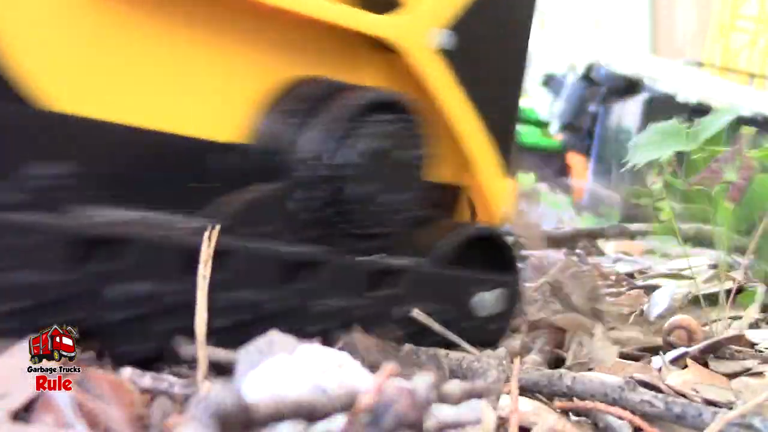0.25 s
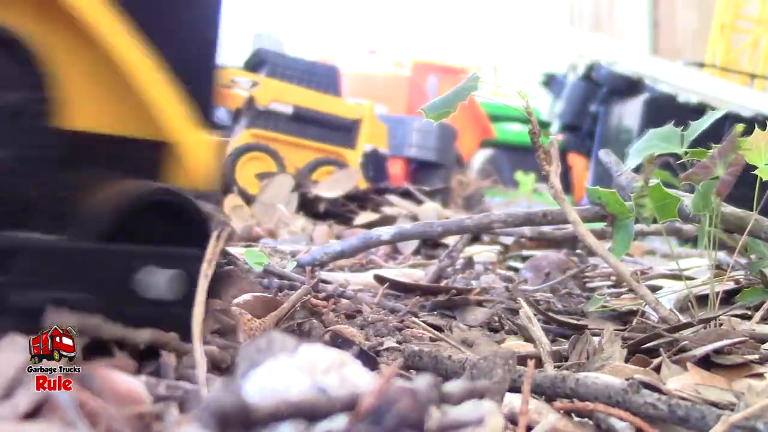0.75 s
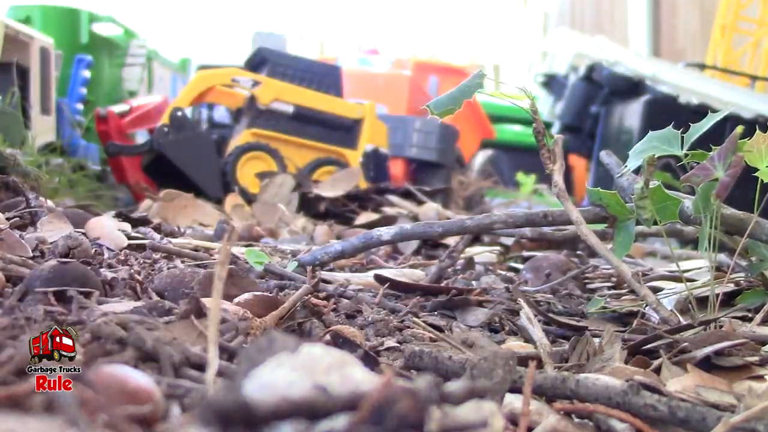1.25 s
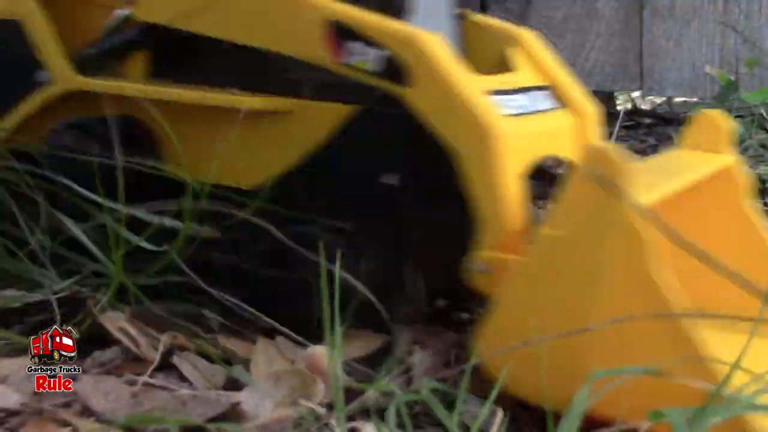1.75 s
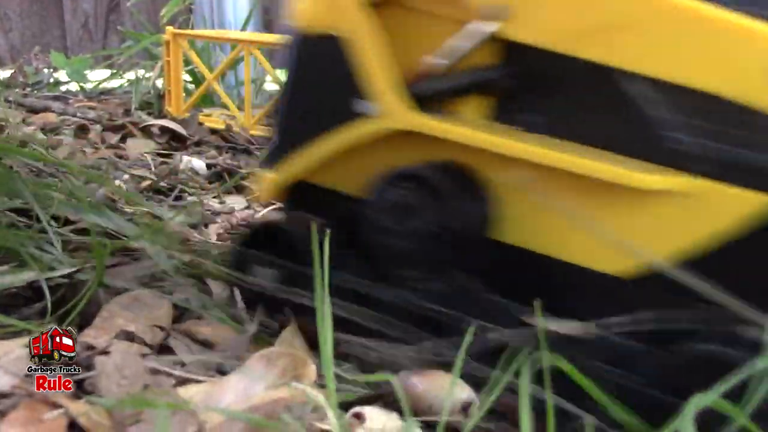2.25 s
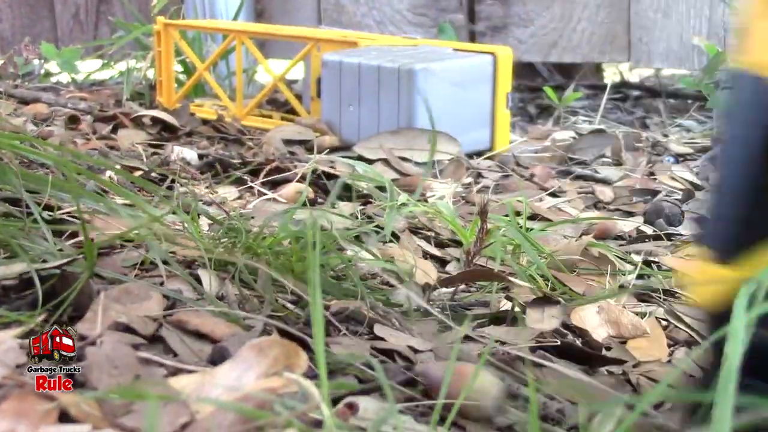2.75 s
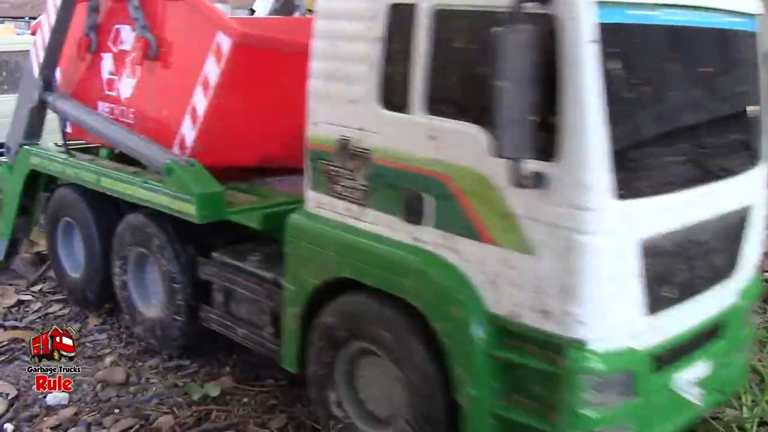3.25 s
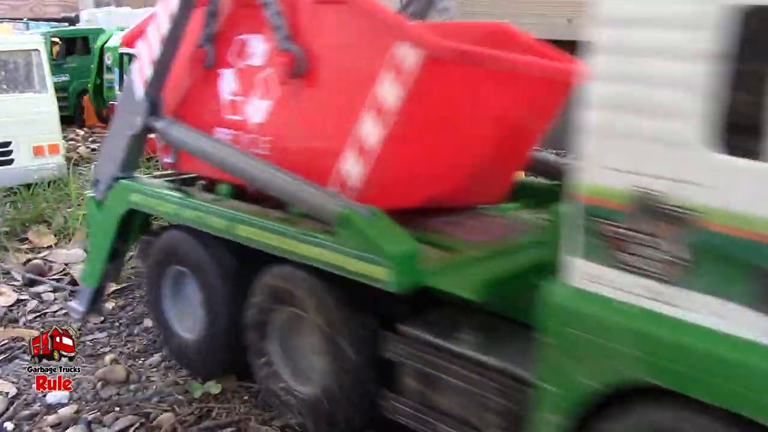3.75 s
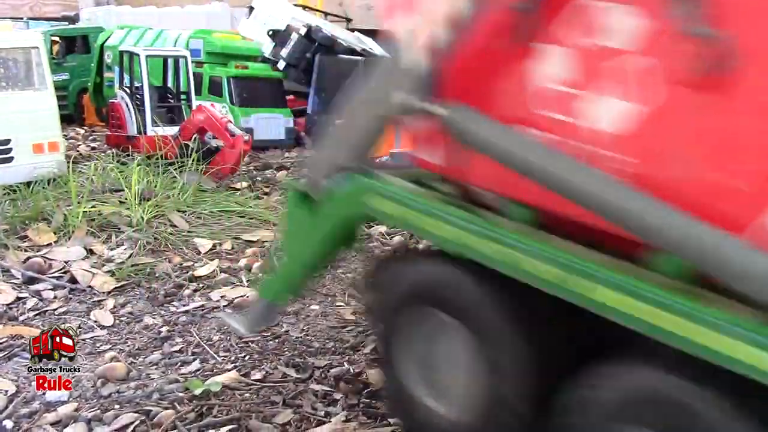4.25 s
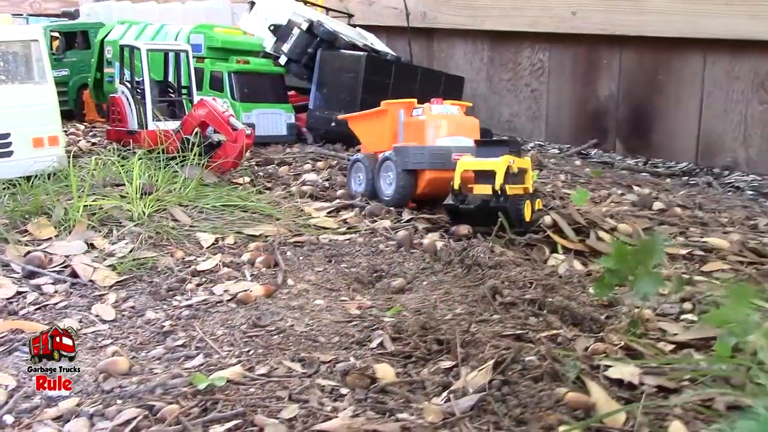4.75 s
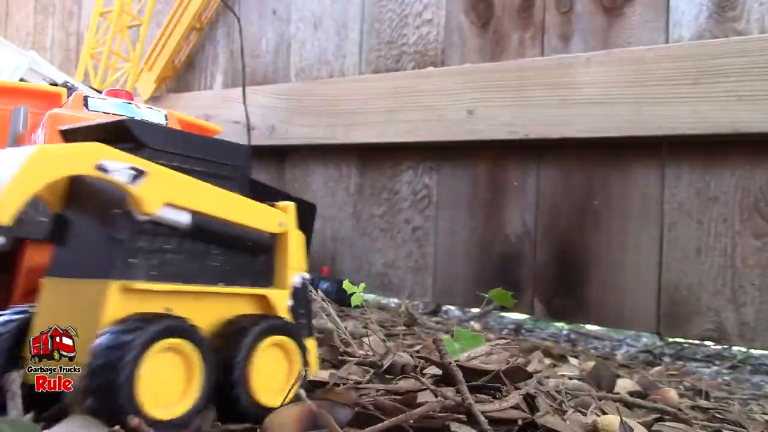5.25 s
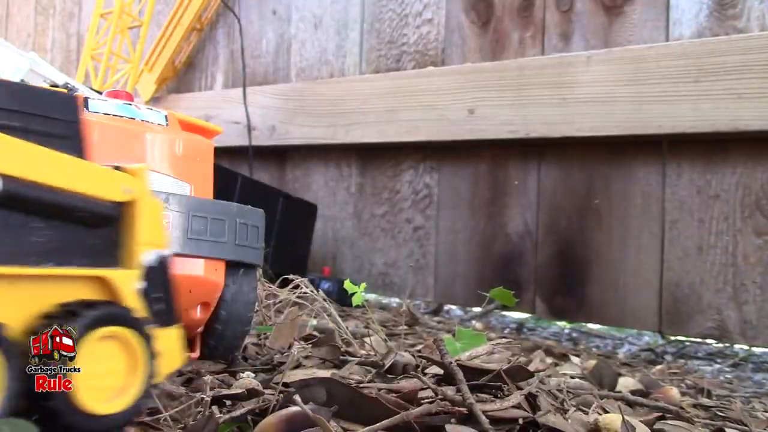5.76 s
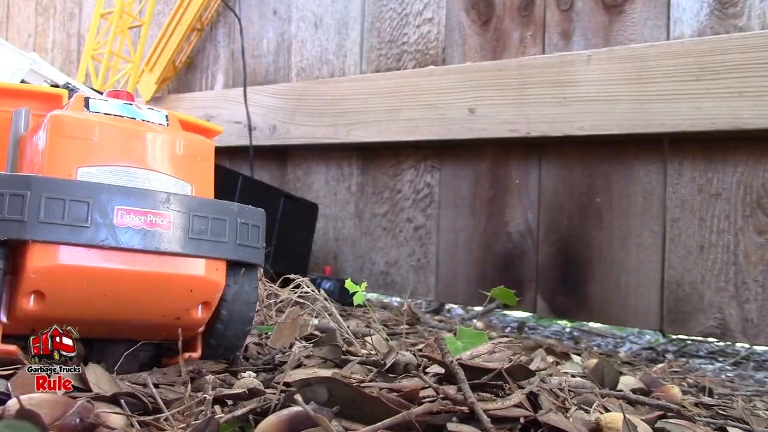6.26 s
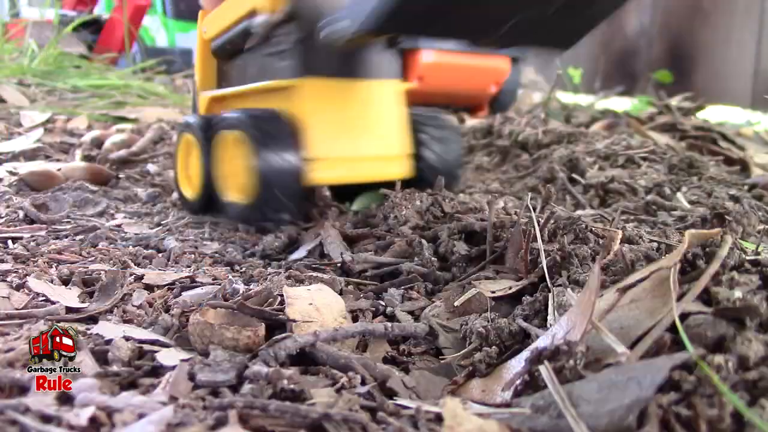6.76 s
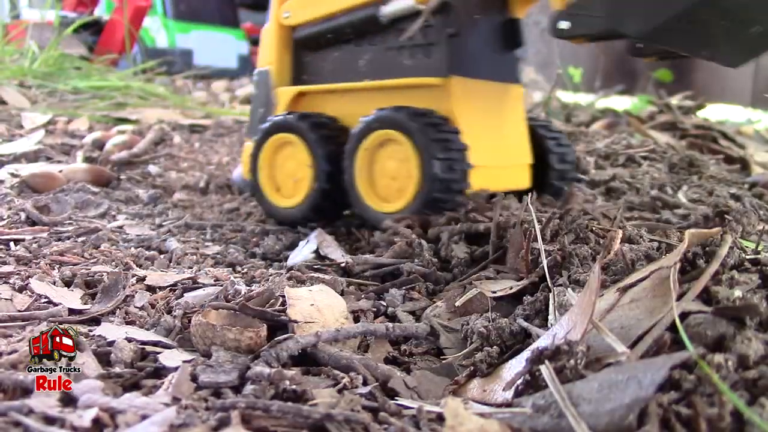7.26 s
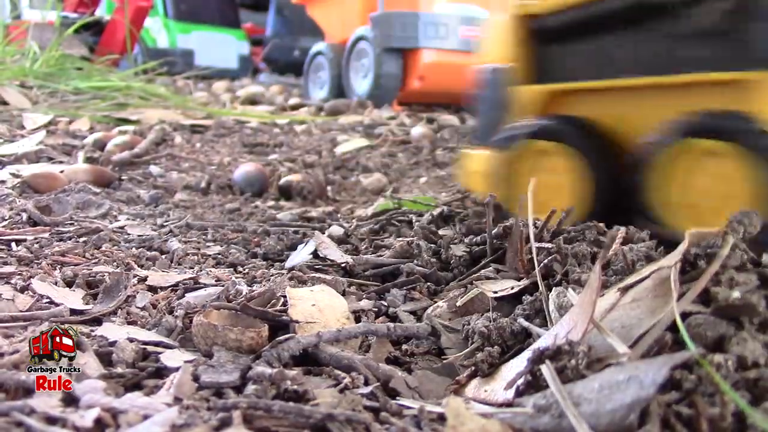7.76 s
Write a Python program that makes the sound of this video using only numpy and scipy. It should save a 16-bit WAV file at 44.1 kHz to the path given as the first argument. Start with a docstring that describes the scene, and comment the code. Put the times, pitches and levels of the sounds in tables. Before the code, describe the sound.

Close crackle of dry leaves and grit under toy truck wheels, with hollow plastic rattles, thumps and small axle squeaks.

```python
"""Plastic toy trucks pushed over dry leaves and dirt close to the microphone, in five corners of a yard.
At first far traffic rumbles behind; grit jolts the wheels and rings the hollow shells, leaves crackle,
parts knock, and a wooden fence throws a short echo back. From 3.2 s, in a quieter corner, a truck with
a deeper shell thumps along. From 5.1 s the last one rolls more softly on dry, squeaking axles, and from
6.75 s a faint hiss of insects swells behind it."""
import sys
import numpy as np
from scipy import signal
from scipy.fft import next_fast_len
from scipy.io import wavfile
from scipy.ndimage import uniform_filter1d

SR = 44100
rng = np.random.default_rng(int(sys.argv[2]) if len(sys.argv) > 2 else 0)


def materialize(psi):
    """Save the field psi as 16-bit PCM at rate SR to the path in sys.argv[1].

    A 1-D psi becomes a single channel; in a 2-D psi each row is a channel.
    """
    bounded = np.clip(np.atleast_2d(psi).T, -1, 1)
    quanta = np.round(bounded * 32767).astype(np.int16)
    wavfile.write(sys.argv[1], SR, quanta)


N = 353682

# far traffic and air in each corner: (start [s], relative level [dB], [(frequency [Hz], density [dB])])
CORNERS = [ (0, -24, [(40, -21), (70, -3), (140, 0.5), (340, 7.5), (450, 5), (800, -9), (1700, -11.5),
           (3200, -30.5), (6500, -25), (9000, -18.5), (16000, -49)]), (1.75, -33, [(40, -20), (70, -14),
           (150, 0.5), (300, -6), (600, -26), (1500, -15.5), (4000, -11), (16000, -15.5)]),
           (3.101, -46.5, [(40, -5), (70, -12), (150, -4), (300, -13), (500, -21), (800, -18), (1500, -39),
           (4000, -16), (16000, -22)]), (5.14, -36, [(40, -27), (70, 4), (150, 6), (250, 2.5), (400, 0),
           (800, 2), (2000, -8), (3500, -18), (7000, -6.5), (16000, -29)]), (6.62, -38.5, [(40, -12),
           (60, -1), (90, 0), (190, 4), (350, -4.5), (750, -1.5), (1500, -13), (2300, -5), (3500, -31),
           (6500, -60), (10000, -16.5), (16000, -31)]), ]
# low hums in the distance: (start [s], end [s], pitch [Hz], waver [Hz], level [dB])
DRONES = [(0.974, 1.755, 143.8, 3.3, -39.5), (1.1, 1.7, 96, 7.8, -48), (3.1, 4.25, 73, 5.1, -58.5),
          (6.652, 8.1, 115, 2.4, -47.5)]
# single dry leaves by the microphone: (time [s], level [dB], pitch [Hz])
LEAF_TICKS = [(0.0298, 11.5, 5100), (0.0732, -9, 4590), (0.1077, -4, 4560), (0.1979, -3, 5050),
              (0.2573, 8, 5560), (0.2927, -3, 9610), (0.4209, 8, 4300), (0.4928, 3, 5670),
              (0.538, -4, 5380), (0.7063, 1, 5710), (0.7512, 0, 6800), (0.8325, 3.5, 5630),
              (0.8964, -3, 5570), (1.0181, -12, 4980), (1.048, -11, 5700), (1.0984, -10, 5260),
              (1.1832, -6, 5530), (1.2231, -6, 9100), (1.3294, -34, 5240), (1.3728, -11, 4510),
              (1.4361, -16, 5260), (1.723, -11, 9100), (1.8277, -8, 4830), (2.0058, 4, 4400),
              (2.174, -9, 4540), (2.2573, -9, 4830), (2.4284, -14, 9000), (2.5661, -6, 7180),
              (2.59, -14.5, 7000), (2.6599, -11.5, 8000), (2.6838, -18, 8970), (2.7457, -17, 8290),
              (2.9512, -5.5, 7400), (3.1093, -27, 5980), (3.2695, -27, 4400), (3.286, -19, 8270),
              (3.3503, -8.5, 7950), (3.3847, -7, 4360), (3.6172, -12, 4500), (3.6391, -4, 4430),
              (3.7479, -12, 5900), (3.7604, -12, 5950), (3.8457, -14.5, 5430), (3.9145, -4.5, 7350),
              (3.9973, -17, 6100), (4.0741, -7.5, 6100), (4.1121, -14, 6240), (4.3874, -4, 4510),
              (4.5221, -10, 4410), (4.6184, -18, 4400), (4.786, -19, 7100), (5.0244, -17, 4650),
              (5.1567, -6, 9410), (5.3403, -15, 7000), (5.6451, -15, 5630), (5.9618, -22, 5280),
              (6.136, -19, 4540), (6.7241, -16, 5290), (6.7625, -7, 7500), (6.7895, -9, 5060),
              (6.8838, -22.5, 10000), (6.9511, -25, 10400), (7.076, -17, 5000), (7.1756, -38, 5170),
              (7.2469, -21, 5200), (7.65, 1, 4600), (7.7717, -15, 4610), (7.8047, -16, 5100)]
# dry axles: (start [s], length [s], first pitch [Hz], last pitch [Hz], level at the crest [dB])
AXLE_SQUEAKS = [(0.105, 0.029, 4660, 4370, -9), (.75, 0.0076, 6960, 6930, -16),
                (0.756, 0.017, 9700, 9500, -23), (0.786, 0.016, 6700, 6740, -19),
                (5.008, 0.058, 2120, 2136, -21), (5.089, 0.058, 2130, 2100, -30),
                (5.144, 0.034, 1950, 2010, -27), (5.22, 0.038, 1310, 1200, -40),
                (5.414, 0.058, 1287, 1146, -28), (5.43, 0.032, 2480, 2380, -23),
                (5.478, 0.038, 1986, 1967, -22), (5.587, 0.043, 1414, 1426, -33),
                (5.595, 0.015, 2080, 2020, -28.5), (5.834, 0.013, 1437, 1460, -22),
                (5.878, 0.031, 1420, 1586, -24.5), (5.902, 0.042, 1530, 1374, -17),
                (5.915, 0.024, 2800, 2820, -21.5), (6.02, .02, 2790, 2850, -23.5),
                (6.056, .07, 2830, 2790, -26), (6.016, 0.015, 1410, 1460, -22),
                (6.039, 0.018, 2020, 1980, -25), (6.043, 0.028, 1424, 1354, -20.5),
                (6.076, .026, 3610, 3640, -24.5), (6.084, 0.032, 1260, 1460, -31),
                (6.158, 0.018, 1333, 1432, -17), (6.204, 0.013, 1490, 1410, -20),
                (6.217, 0.041, 1380, 1180, -27.5), (6.21, 0.061, 2660, 2620, -32),
                (6.262, 0.016, 4020, 4200, -35), (6.292, 0.018, 2640, 2660, -31),
                (6.231, 0.016, 3950, 3780, -24), (6.249, 0.036, 1290, 1444, -20.5),
                (6.253, 0.025, 2190, 1970, -21), (6.287, 0.026, 1290, 1320, -21),
                (6.299, 0.018, 1900, 1960, -22), (6.387, 0.017, 1470, 1480, -30),
                (6.414, .04, 1504, 1410, -25.5), (6.538, 0.06, 2070, 1980, -39),
                (6.612, 0.058, 1480, 1450, -39), (6.722, 0.015, 5500, 5070, -21),
                (6.775, 0.028, 2000, 2030, -24), (6.96, 0.041, 1480, 1515, -35.5),
                (6.993, 0.036, 2370, 2165, -30.5), (7.364, 0.041, 2040, 1970, -35),
                (7.579, 0.064, 1950, 2000, -26), (7.629, 0.0355, 2023, 1466, -14.5),
                (7.634, 0.024, 3650, 3780, -20), (7.646, 0.019, 2900, 2850, -16),
                (7.668, 0.033, 1140, 1210, -22), (7.7, 0.016, 1500, 1570, -6),
                (7.712, 0.031, 1390, 1516, -13), (7.778, 0.031, 2174, 2150, -12.5),
                (7.801, 0.026, 1895, 1850, -7), (7.863, 0.024, 2040, 2040, -21),
                (7.882, .024, 1605, 1470, -22)]
# knocks of wheels and parts, and the sharp starts of axle squeaks:
# (time [s], blow [dB], shell thump [dB], pitch [Hz], crack against blow [dB])
KNOCKS = [(0.031, -4, -23, 744, -3), (0.072, 0, -28, 1280, -3), (0.107, 1, -37, 964, 0),
          (0.173, -2, -13, 1450, -10), (0.198, -11, -34, 937, 4), (0.327, -6, -7.5, 940, -1),
          (0.376, 2, -21, 2070, -1), (0.42, -3, -28, 680, -1), (0.447, 3, -18, 695, -7),
          (0.516, -1, -28, 1050, 10), (0.702, 0, -11.5, 750, -13), (0.877, -11, -18, 950, -5),
          (0.899, -15, -27, 904, -3), (1.017, -5, -34, 2080, -5), (1.031, 1, -33, 776, 0),
          (1.08, -3, -20, 880, 2), (1.093, -4, -19, 670, -3), (1.182, -6, -30, 725, -3),
          (1.228, 1.5, -14, 734, -5), (1.33, -10, -45, 1060, -3), (1.828, -13, -36, 780, -1),
          (1.841, -8.5, -34, 1750, -3), (2.004, -5.5, -40, 1000, 13.5), (2.174, -1.5, -26, 2830, 1),
          (2.255, 3, -17, 1660, -1), (2.319, -12, -16.5, 960, 3), (2.427, -3.5, -19, 1660, -13),
          (2.457, -5, -12, 800, -7), (2.471, -1, -27, 1020, 9.5), (2.512, -7, -27, 1040, -5),
          (2.727, -5, -33, 1030, -5), (2.792, -10, -38, 1030, -3), (2.881, -9.5, -28, 886, -14),
          (2.899, -6, -18, 1250, -9), (2.924, 1.5, -27, 600, 1), (2.951, 1.5, -26, 1030, -8),
          (2.977, -0.5, -28, 670, -2), (3.012, -8, -18, 816, -13), (3.11, -5, -30, 640, -8),
          (3.352, -7.5, -33, 3100, -15), (3.386, -4.5, -9, 640, 7), (3.477, -9.5, -11, 1200, -7),
          (3.615, -3, -38, 1360, 0), (3.887, -29, -13, 886, -3), (3.992, -9, -10.5, 694, -3),
          (4.144, -7.5, -6.5, 710, 7), (4.27, 2, 3, 560, 3.5), (4.339, -1.5, -6, 775, 0),
          (4.389, -15, -8, 900, -3), (4.449, -24, -10, 608, -3), (4.522, 4, -1, 1350, -8),
          (4.571, -10, 2.5, 605, -3), (4.617, 3, -9, 1100, -3), (4.731, -5, -25, 1060, -10),
          (4.786, -6, -27, 600, -8), (4.804, 0.5, -8, 643, 4), (4.933, -22, -5, 720, 4),
          (5.008, -1, -14, 796, -3), (5.025, 3.5, -19, 1500, -11), (5.361, -12, -45, 1500, -12),
          (5.476, -10, -46, 1920, 4), (5.838, -7, -45, 1480, -3), (5.888, -30, -47, 1510, -3),
          (5.907, -26, -43, 1520, -1), (5.971, -10.5, -26, 1820, 5), (6.026, -10, -44, 1500, 0),
          (6.14, -1, -33, 1530, 4), (6.21, -14, -51, 1370, -6), (6.297, -22, -44, 1320, -7),
          (6.349, -17, -45, 1320, -3), (6.361, -14, -44, 1390, -5), (6.377, -7.5, -39, 1950, -8),
          (6.425, 0.5, -40, 1640, 4), (6.462, -8, -39, 2040, -3), (6.527, -14.5, -42, 2040, -5),
          (6.625, -11, -38, 1520, -1), (6.731, 1.5, -49, 2260, -20), (6.884, -17.5, -37, 2060, 8),
          (7.411, -10.5, -41, 2040, 13), (7.579, -16, -20, 2020, -3), (7.628, -6, -46, 1990, -12),
          (7.651, -3.5, -49, 1590, 4), (7.704, -23, -40, 1550, -3), (7.77, 2, -41, 2120, 10),
          (7.803, 1, -43, 1880, -3), (7.872, -9, -32, 2010, 0), (7.909, -3.5, -39, 1890, 14),
          (7.996, -3, -48, 1550, 0)]
# surges of crunch as a truck lurches on: (start [s], hold [s], lift [dB])
SHOVES = [(0.023, 0.31, 2), (0.322, 0.014, 2), (0.431, .13, 14.5), (0.703, 0.25, 11), (1.025, 0.028, 6),
          (1.089, 0.084, 11.5), (1.186, 0.076, 11), (1.704, 0.036, 7), (1.83, .04, 2), (1.994, 0.048, 10.5),
          (2.17, 0.031, 3), (2.43, .07, 4), (2.706, 0.069, 4.5), (2.891, .1, 12), (3.077, 0.029, -1),
          (3.38, 0.051, 15.5), (3.461, 0.032, 10), (3.621, 0.025, 17.5), (3.745, 0.076, 4),
          (3.896, 0.016, 10.5), (3.989, 0.023, 11.5), (4.116, 0.1, 3.5), (4.27, 0.032, 2.5),
          (4.348, 0.056, 6.5), (4.522, 0.079, 7), (4.612, 0.053, 15.5), (4.798, 0.061, 7.5),
          (4.917, 0.03, 5.5), (5.005, .06, 5.5), (5.416, 0.14, 11.5), (5.555, 0.043, 13), (5.828, 0.012, 3),
          (5.907, 0.024, 17), (5.97, .04, 13.5), (6.02, 0.16, 10.5), (6.22, 0.096, 11), (6.348, 0.13, 18.5),
          (6.523, 0.067, 12), (6.634, 0.067, 15), (6.71, 0.088, 22), (6.955, 0.088, 1), (7.347, 0.053, 7.5),
          (7.45, 0.063, 12.5), (7.579, 0.12, 13), (7.682, 0.06, 4.5), (7.76, 0.09, 7), (7.865, 0.047, 7.5)]
# share of that lift each part takes: (wheels [ratio], shell [ratio], leaves [ratio])
SHOVE_SHARE = [0.8, 0.48, 0.55]
# rolling drive before shoves, one list a corner: (time [s], wheels [dB], shell [dB], leaves [dB])
PASSES = [
    [(0.02, -15, -21, -14), (0.386, -17.5, -24.5, -19.5), (0.51, -24, -29.5, -23), (0.764, -17, -25.5, -19),
     (0.948, -20.5, -29.5, -23), (1.086, -19, -24, -24), (1.26, -24, -32.5, -32), (1.42, -32, -38, -72),
     (1.67, -29, -35, -32)],
    [(1.68, -32.5, -47, -29), (1.846, -25, -30.5, -26), (2.048, -30.5, -33.5, -31.5),
     (2.24, -21, -31.5, -24.5), (2.368, -20.5, -28, -25), (2.504, -23, -30.5, -24.5),
     (2.874, -23.5, -30, -34), (2.97, -29, -34, -43), (3.17, -25.5, -26.5, -35)],
    [(3.18, -38.5, -34, -38.5), (3.374, -36.5, -23, -38), (3.562, -32, -24.5, -34),
     (4.114, -27.5, -21, -30.5), (4.466, -19.5, -13, -32), (4.584, -22.5, -15.5, -38.5),
     (4.962, -18.5, -15.5, -38.5), (5.064, -18, -23.5, -28), (5.12, -19.5, -19, -28.5)],
    [(5.13, -25.5, -54, -32), (5.2, -36, -69, -42), (5.652, -39.5, -45, -39.5), (5.892, -35.5, -61, -44),
     (6.048, -28.5, -52, -35.5), (6.13, -28.5, -55, -53), (6.238, -38, -64, -35), (6.486, -36, -43, -56),
     (6.61, -29, -43, -62)],
    [(6.62, -38, -39, -60), (6.76, -39, -53, -44.5), (7.056, -43, -70, -75), (7.294, -40.5, -45, -47),
     (7.458, -41.5, -48, -47.5), (7.622, -34, -54, -44.5), (7.774, -22.5, -60, -33),
     (7.852, -25, -35, -34.5), (8.02, -23.5, -35, -34)],
]
# each truck: (start [s], shell modes, wheel and frame modes, spectrum of the leaves under it)
# a mode is (pitch [Hz], width [Hz], relative level [dB]); a spectrum point (frequency [Hz], density [dB])
TRUCKS = [ (0, [(362, 200, -21), (622, 120, 32)], [(806, 330, -2), (1083, 270, -2), (1380, 160, -5),
          (1730, 440, -4.5), (2370, 1020, -2.5), (2720, 360, -4.5), (4130, 1500, -12.5)], [(1470, 1),
          (2500, -6), (3040, -6), (3380, 3), (4580, -1.5), (4840, -1), (5560, 0), (6450, -7),
          (12900, -16.5), (16000, -25)]), (1.68, [(385, 120, -13.5), (607, 60, -1.5)], [(763, 180, 3),
          (1035, 180, 6.5), (1212, 135, 4), (1720, 590, 4.5), (2320, 117, -1.5), (2760, 290, -2.5),
          (3970, 490, -6)], [(1470, 3), (2500, -24), (2880, 7), (3180, -4), (3800, -10), (4110, -2),
          (5270, -6), (8200, -5), (14200, -24), (16000, -77)]), (3.18, [(206, 42, -18.5), (256.6, 50, -7.5),
          (344.5, 133, -0.5), (451, 146, 2.5), (584, 140, -10.5)], [(724, 580, 0), (1004, 45, -8),
          (1240, 540, -6.5), (2240, 1200, -2.5), (2860, 1700, -4), (3600, 1160, -10.5)], [(1470, -55),
          (2500, 9.5), (3380, 0.5), (4990, -6.5), (6060, -5), (9080, -11), (10900, -17), (12400, -25),
          (14900, -38), (16000, -46)]), (5.129, [(285, 630, -0.5), (527, 630, -10.5)], [(750, 1030, -2.5),
          (1225, 900, 0.5), (1550, 470, 1.5), (2070, 104, -3.5), (2360, 50, -17), (2520, 86, -14),
          (3560, 1100, -14)], [(1470, -22), (2500, -13), (2850, 8), (3040, 0), (4310, -4.5), (5030, -6),
          (5920, -8), (10000, -12.5), (12800, -24), (16000, -38)]), ]
# stereo spread of the background: (frequency [Hz], side against mid [dB])
FAR_SIDE = [(60, -18), (300, -19), (1000, -24), (2500, -37), (16000, -23)]
# stereo spread of the trucks before widening: (frequency [Hz], side against mid [dB])
NEAR_SIDE = [(60, -25), (130, -41), (290, -48), (640, -47), (1410, -64), (3100, -29.5), (6820, -16.5),
             (15000, -16.5)]
# trucks in the image: (time [s], left over right before widening [dB], widening of side and lean [dB])
IMAGE = [(0, 0, 1), (1.25, 1, 8.5), (1.8, 1.5, -25), (2.3, -.5, 2.5), (3.13, 0.5, 14), (3.3, .5, -10),
         (3.9, 1, -8.5), (4.1, 0, 11.5), (5.1, 0.5, 10), (5.25, -0.5, -4), (5.9, 1.5, 2.5), (6.7, 1, 8),
         (6.85, 2.5, -32), (7.5, 0.5, -4), (8.02, .5, 7)]


def gain_of(db):
    """Decibels to amplitude."""
    return 10 ** (np.asarray(db) / 20)


def unit_rms(x):
    """Scales to rms 1."""
    return x / np.sqrt(np.mean(x ** 2) + 1e-20)


def db_at(spectrum, hz):
    """Reads a spectrum on a log-frequency axis."""
    points_hz, db = np.transpose(spectrum)
    return np.interp(np.log(hz + 1), np.log(points_hz + 1), db)


def add(mix, start, sound):
    """Mixes a sound in at start seconds."""
    part = mix[round(start * SR):][:len(sound)]
    part += sound[:len(part)]


def gate(t, on, off, fade_s=0.034):
    """Equal-power fades, in at on and out at off."""
    return np.sqrt(np.clip((t - on) / fade_s + .5, 0, 1) * np.clip((off - t) / fade_s + .5, 0, 1))


def spans(table):
    """(on, off) times of rows that each last until the next starts."""
    edges = [-1, *[row[0] for row in table[1:]], N / SR + 1]
    return zip(edges[:-1], edges[1:])


def wander(count, size, turn_s):
    """Slow random curves of rms 1 that turn over in about turn_s seconds."""
    steps = size // 64 + 2
    slow = uniform_filter1d(rng.standard_normal((count, steps)), max(int(turn_s * SR / 64), 2), 1)
    return [np.interp(np.arange(size) / 64, np.arange(steps), unit_rms(row)) for row in slow]


def burst(noise, db, t60, rise_s):
    """Shapes noise to a quick rise and a fall of 60 dB in t60 seconds."""
    t = np.arange(len(noise)) / SR
    return gain_of(db - 60 * t / t60) * (1 - np.exp(-t / rise_s)) * noise


def resonate(x, hz, width):
    """One damped mode, width Hz wide."""
    r, w = np.exp(-np.pi * width / SR), 2 * np.pi * hz / SR
    return np.sqrt(2 * (1 - r * r)) * np.sin(w) * signal.lfilter([1], [1, -2 * r * np.cos(w), r * r], x)


def ring(drive, modes, shift_db, shift_s):
    """Drives a body; as the point of contact moves, each mode is struck harder or softer."""
    total = np.linalg.norm([gain_of(db) for _, _, db in modes])
    contact = wander(len(modes), len(drive), shift_s)
    body = sum((-1) ** k * resonate(drive * gain_of(db + shift_db * contact[k]), hz, width)
               for k, (hz, width, db) in enumerate(modes)) / total
    # a small body sends out little sound below its lowest mode
    return signal.sosfilt(signal.butter(3, 0.82 * modes[0][0], "high", fs=SR, output="sos"), body)


def scatter(x, t60, delay_samples, turn_hz=5):
    """Three sets of sparse echoes fade in turn at a steady rate, so no fixed ringing colour is heard."""
    turn = 2 * np.pi * turn_hz * np.arange(N) / SR
    slots = np.arange(delay_samples, 3980, 20)
    out = np.zeros(N)
    for k in range(3):
        taps = np.zeros(4000)
        signs = rng.choice([-1., 1.], len(slots))
        taps[slots + rng.integers(0, 20, len(slots))] = signs * gain_of(-60 * slots / SR / t60)
        share = np.sqrt(2 / 3) * np.cos(turn + k * np.pi / 3)
        out += signal.oaconvolve(x * share, taps / np.linalg.norm(taps))[:N]
    return out


def far_traffic():
    """Distant traffic and air, a patchy noise coloured by each corner; two unrelated rows."""
    frames, hz = N // 512 + 5, np.fft.rfftfreq(2048, 1 / SR)
    t = np.arange(frames) * 512 / SR
    power = np.zeros((len(hz), frames))
    for (on, off), (_, db, spectrum) in zip(spans(CORNERS), CORNERS):
        density = gain_of(db_at(spectrum, hz)) ** 2
        power += np.outer(density / density.sum(), (gain_of(db) * gate(t, on, off)) ** 2)
    noise = rng.standard_normal((frames, len(hz), 5)).T
    patches = unit_rms(uniform_filter1d(uniform_filter1d(noise[4], 24, 0), 4, 1))
    spectra = (noise[[0, 2]] + 1j * noise[[1, 3]]) * np.sqrt(power) * gain_of(2.85 * patches)
    return 0.65 * signal.istft(spectra, nperseg=2048, noverlap=1536)[1][:, :N]


def drones(t):
    """Low, distant tones that waver in pitch and level."""
    out = np.zeros(N)
    for on, off, hz, waver_hz, db in DRONES:
        drift, swell = wander(2, N, turn_s=0.069)
        tone = np.sqrt(2) * np.sin(2 * np.pi * np.cumsum(hz + waver_hz * drift) / SR)
        out += gain_of(db + 2.8 * swell) * gate(t, on, off) * tone
    return out


def insects(t, start_s=6.75, start_db=-57, swell_db_per_s=14, hz=5240, width_hz=800):
    """Insects in the last corner, a narrow, uneven hiss that swells; two unrelated rows."""
    hiss = resonate(resonate(rng.standard_normal((2, N)), hz, width_hz), hz, width_hz)
    flicker_db = 3.4 * wander(1, N, turn_s=0.033)[0]
    level_db = start_db + swell_db_per_s * (t - start_s) + flicker_db
    return unit_rms(hiss) * gain_of(level_db) * gate(t, start_s, 9)


def leaf_ticks():
    """Single dry leaves tick close by, each a few milliseconds of noise around its own pitch."""
    out = np.zeros(N)
    for start, db, hz in LEAF_TICKS:
        tick = np.diff(burst(rng.standard_normal(900), db, t60=0.0075, rise_s=0.0021))
        add(out, start, resonate(resonate(tick, hz, 0.92 * hz), hz, 0.92 * hz))
    return out


def leaf_crackle(drive, spectrum):
    """Leaves differ in size: jolts are dealt out to six overlapping bands, clump by clump."""
    bands = [(hz, hz, 0) for hz in np.geomspace(2600, 13000, num=6)]
    crackle = ring(np.diff(drive, prepend=0), bands, shift_db=4.5, shift_s=.006)
    # a minimum-phase filter colours the crackle and keeps its attacks sharp
    colour_db = np.maximum(db_at(spectrum, abs(np.fft.fftfreq(2048, 1 / SR))), -70)
    log_response = np.conj(signal.hilbert(np.log(gain_of(colour_db))))
    impulse = np.fft.ifft(np.exp(log_response)).real[:512]
    return signal.oaconvolve(crackle, impulse / np.linalg.norm(impulse))[:len(drive)]


def axle_squeak(length, from_hz, to_hz, db, flutter_db=3.0, overtone_db=-21.5):
    """Stick and slip on a dry axle: a gliding, wavering tone that swells, flutters and fades."""
    progress = np.arange(0, length, 1 / SR) / length
    waver, flutter = (unit_rms(uniform_filter1d(rng.standard_normal(6000), size))[:len(progress)]
                      for size in (90, 60))
    hz = (from_hz + (to_hz - from_hz) * progress) * (1 + .013 * waver)
    phase = 2 * np.pi * np.cumsum(hz) / SR
    tone = np.sqrt(2) * (np.sin(phase) + gain_of(overtone_db) * np.sin(2 * phase))
    swell_db = np.interp(progress, [0, 0.55, 1], [-10.5, 0, -10.5])
    return tone * gain_of(db + swell_db + flutter_db * flutter) * signal.windows.tukey(len(tone), .25)


def knocks():
    """Knocks and the sharp starts of squeaks: drives for wheels, shell and leaves, and a note each."""
    wheels, shell, leaves, notes = np.zeros((4, N))
    for start, blow_db, thump_db, hz, crack_db in KNOCKS:
        noise = rng.standard_normal((4, 2600))
        chatter = burst(noise[1], blow_db - 8, t60=0.04, rise_s=0.00028)
        crack = burst(noise[3], blow_db + crack_db, t60=0.0028, rise_s=0.00014)
        strike = burst(noise[3], blow_db - 11.5, t60=0.04, rise_s=0.00078)
        add(wheels, start, chatter + crack)
        add(shell, start, burst(noise[0], thump_db, t60=0.083, rise_s=0.0036))
        add(leaves, start, burst(noise[2], blow_db - 29, t60=0.21, rise_s=0.0007))
        add(notes, start, ring(strike, [(hz, 0.22 * hz, 0)], shift_db=-4, shift_s=0.029))
    return np.array([wheels, shell, leaves]), notes


def grit(per_s, spread_db, bed, clump_db, clump_s):
    """Dirt under the wheels: random jolts of uneven size over a bed of noise, coming in clumps."""
    strength, side, chance = rng.random((3, N))
    size = gain_of(spread_db * np.minimum(-np.log(strength + 1e-9), 4)) * np.sign(side - .5)
    jolts = unit_rms(size * (chance < per_s / SR)) + bed * rng.standard_normal(N)
    slow = uniform_filter1d(rng.standard_normal(N), int(clump_s * SR))
    clumps = unit_rms(uniform_filter1d(slow, 99))
    return unit_rms(jolts * gain_of(clump_db * clumps))


def shoves(t, rise_s=0.002, fall_s=0.011):
    """Lift in dB as a truck lurches on: each shove sets in quickly, holds and lets go."""
    return sum(db * np.clip((t - start) / rise_s, 0, 1) * np.clip((start + hold - t) / fall_s + 1, 0, 1)
               for start, hold, db in SHOVES)


def rolling_trucks(t):
    """Right at the microphone, grit and knocks ring each truck's shell and wheels and crush leaves."""
    roughness = [grit(per_s=1300, spread_db=2.95, bed=0.6, clump_db=2.4, clump_s=0.004),  # wheels
                 grit(per_s=400, spread_db=0.77, bed=0.53, clump_db=3.1, clump_s=0.028),  # shell
                 grit(per_s=1500, spread_db=1.2, bed=1.0, clump_db=0.5, clump_s=0.0041)]  # leaves
    times, *levels = np.transpose(np.concatenate(PASSES))
    drives, out = knocks()
    lift_db = shoves(t)
    for drive, db, share, jolts in zip(drives, levels, SHOVE_SHARE, roughness):
        drive += gain_of(np.interp(t, times, db) + share * lift_db) * jolts
    for (on, off), (_, shell_modes, wheel_modes, leaf_spectrum) in zip(spans(TRUCKS), TRUCKS):
        part = slice(max(int((on - .1) * SR), 0), int((off + .2) * SR))
        wheel_drive, shell_drive, leaf_drive = drives[:, part] * gate(t[part], on, off)
        shell = ring(shell_drive, shell_modes, shift_db=2.0, shift_s=.04)
        wheels = ring(wheel_drive, wheel_modes, shift_db=2.5, shift_s=.02)
        add(out, part.start / SR, shell + wheels + leaf_crackle(leaf_drive, leaf_spectrum))
    return out


def scene():
    """Trucks close up, the fence echo and the far background, in a narrow stereo image."""
    t, fft_size = np.arange(N) / SR, next_fast_len(N)
    near = rolling_trucks(t) + leaf_ticks()
    for start, *squeak in AXLE_SQUEAKS:
        add(near, start, axle_squeak(*squeak))
    near += gain_of(-10) * scatter(near, t60=0.053, delay_samples=60)  # echo off the wooden fence
    far, far_spread = far_traffic() + insects(t)
    far += drones(t)
    times, lean_db, widening_db = np.transpose(IMAGE)
    widening = gain_of(np.interp(t, times, widening_db))
    # a faint, shifting stereo spread around the trucks, widening and narrowing
    near_spread = scatter(near, t60=0.04, delay_samples=0) * widening
    hz = np.fft.rfftfreq(fft_size, 1 / SR)
    near_side = np.fft.rfft(near_spread, fft_size) * gain_of(db_at(NEAR_SIDE, hz))
    far_side = np.fft.rfft(far_spread, fft_size) * gain_of(db_at(FAR_SIDE, hz))
    side = np.fft.irfft(near_side + far_side, fft_size)[:N]
    pan_db = widening * np.interp(t, times, lean_db) / 2
    return np.array([near * gain_of(pan_db) + far + side, near * gain_of(-pan_db) + far - side])


def record(dry):
    """The small microphone loses the deep bass, rounds off the highest peaks and ends at 15.9 kHz."""
    thin = signal.sosfilt(signal.butter(2, 55., "high", fs=SR, output="sos"), dry)
    rounded = thin / (1 + abs(thin) ** 6) ** (1 / 6)
    band_limit = signal.firwin(511, 15900, window=("kaiser", 9), fs=SR)
    return signal.oaconvolve(rounded, band_limit[None], "same")


dry = scene()
out = record(dry)
materialize(out)
```